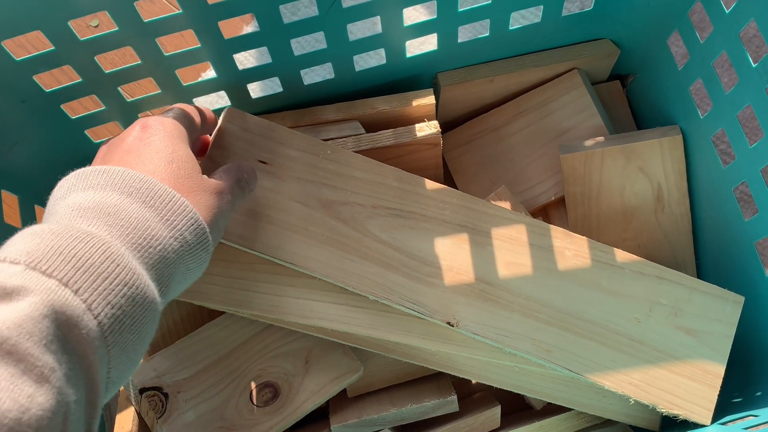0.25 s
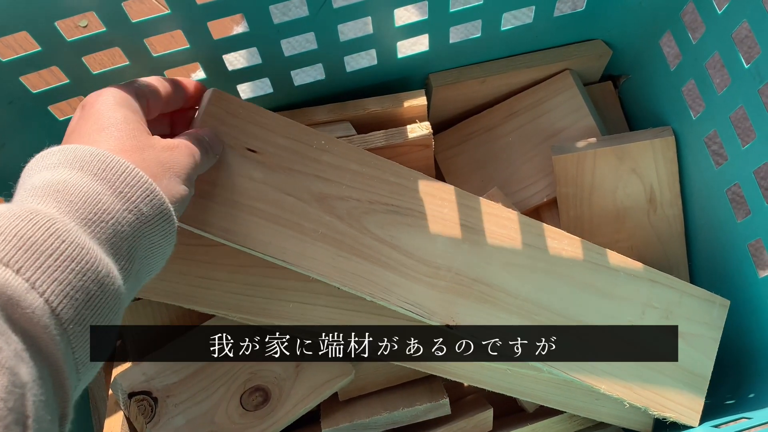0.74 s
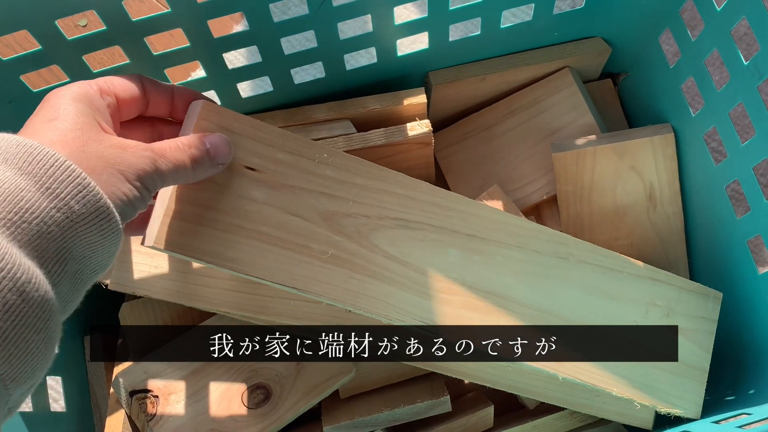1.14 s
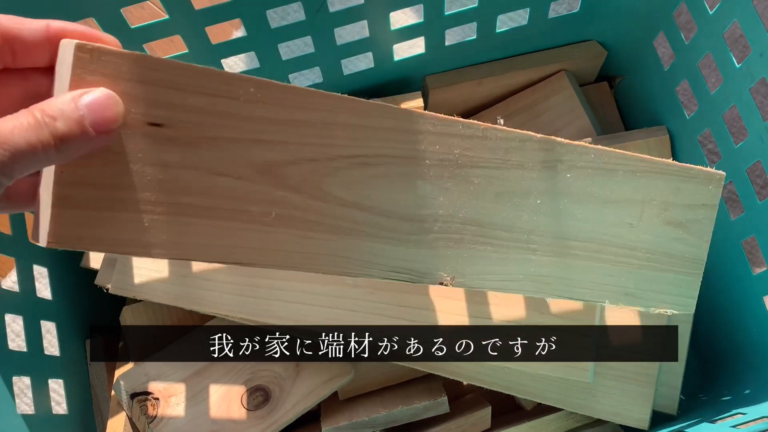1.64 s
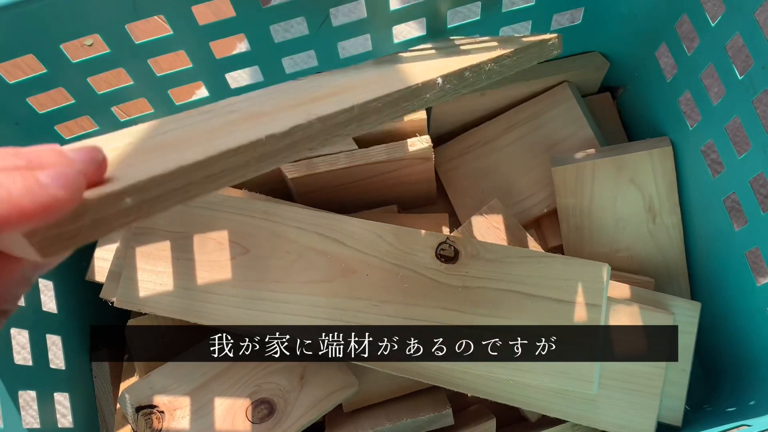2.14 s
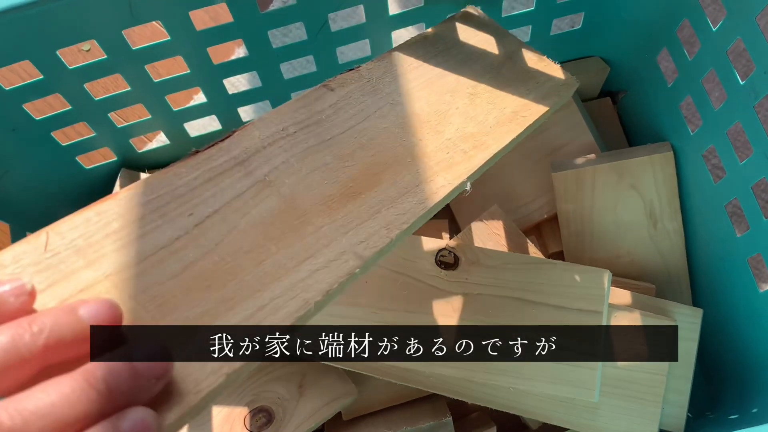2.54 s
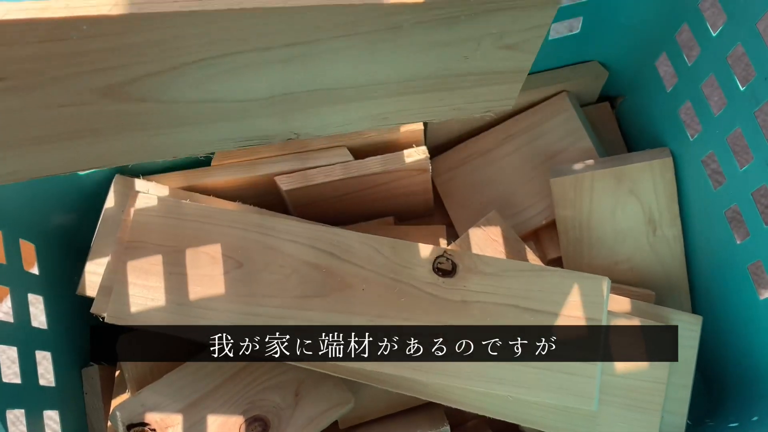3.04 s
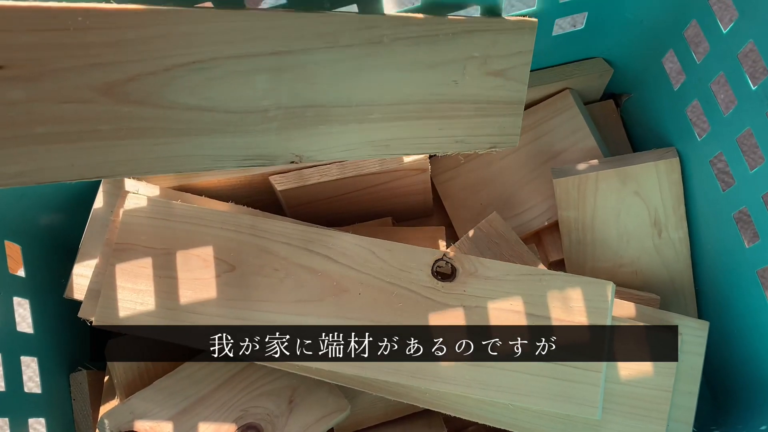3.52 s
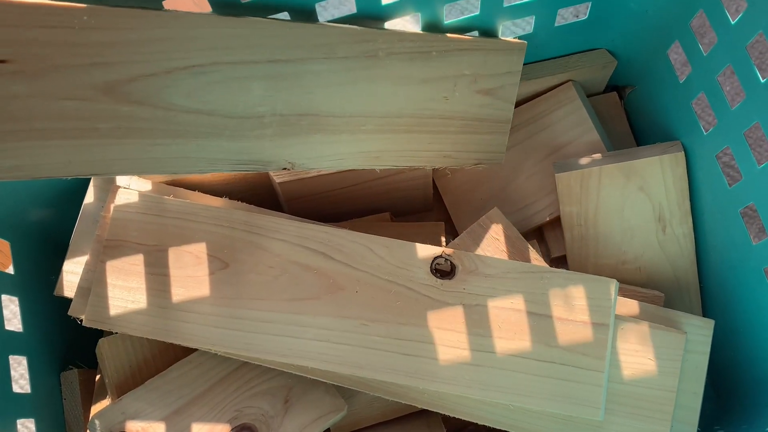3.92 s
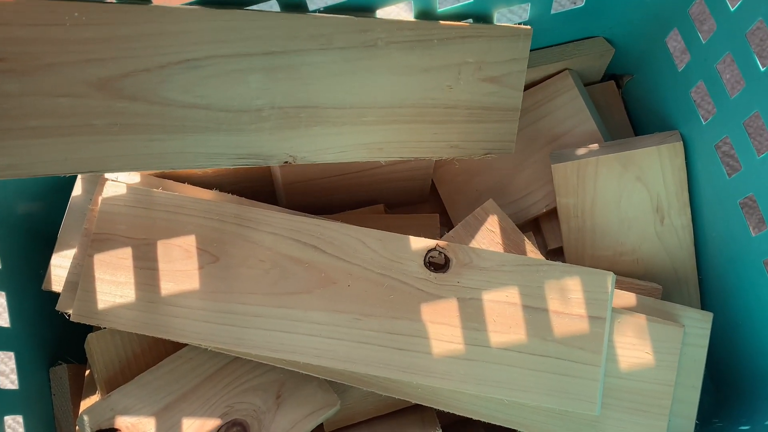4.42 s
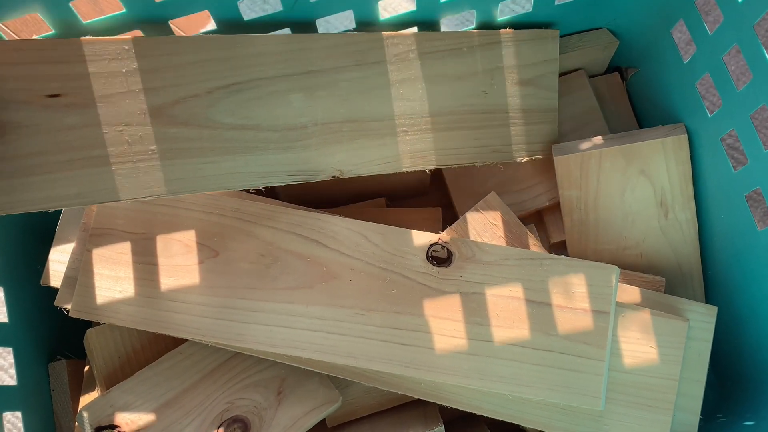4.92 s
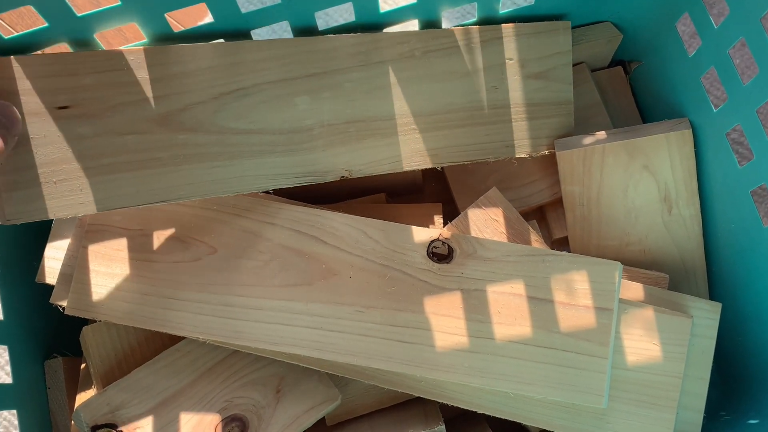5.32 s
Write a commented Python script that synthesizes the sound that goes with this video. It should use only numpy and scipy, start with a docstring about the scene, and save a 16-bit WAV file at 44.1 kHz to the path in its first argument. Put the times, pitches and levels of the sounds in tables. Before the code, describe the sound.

Close stereo phone pickup outdoors. A hand rubs and slides over dry wooden boards in a plastic basket with faint ticks, then a board knocks lightly at about two seconds. After a quieter gap with gusty wind, several dull knocks and scrapes rattle the pile, building to one much louder clack near five seconds, then a soft slide.

```python
"""Wooden boards are slid, lifted and dropped in a plastic basket outdoors, close to a phone.
Wind, hiss, a murmur and a hum, all shaped noise, run throughout. First come light touches and sliding:
uneven bursts of noise through the boards' resonances. Faint whistles, narrow noise bands, sound between
1.7 and 2.9 s. Blows at 2.2 s and from 3.3 s ring fading tones, crack and rattle the pile, amid more
sliding. The loudest falls at 4.94 s; a light blow and a last slide follow."""
import sys
import numpy as np
from scipy import signal
from scipy.fft import rfft, irfft, next_fast_len
from scipy.io import wavfile
from scipy.ndimage import uniform_filter1d, map_coordinates

SR = 44100
rng = np.random.default_rng(int(sys.argv[2]) if len(sys.argv) > 2 else 0)


def inscribe(sig):
    """Save sig as 16-bit PCM at rate SR to the path in sys.argv[1].

    A 1-D sig is mono; a 2-D sig holds one channel per row.
    Samples are clipped to [-1, 1] before scaling.
    """
    pcm = np.round(np.clip(np.atleast_2d(sig).T, -1, 1) * 32767)
    wavfile.write(sys.argv[1], SR, pcm.astype(np.int16))


N = 245195  # length in samples

# Steady background hiss, its colour: (f/Hz, relative level/dB)
HISS_COLOUR = [(150, 7), (400, 1), (1000, -2), (2500, -6.5), (4600, -6.5), (7000, -8.5), (11000, -5),
               (13000, 2.5), (15800, -4.5)]
# Distant outdoor murmur, its colour: (f/Hz, relative level/dB)
MURMUR_COLOUR = [(300, -10), (600, -3.5), (1000, -9.5), (1400, -6.5), (2200, -14), (3000, -16)]
# Wind on the microphone over time: (t/s, strength/dB)
WIND_STRENGTH = [(0.0, -68.5), (0.2, -64.5), (0.4, -70.5), (1.25, -66), (1.43, -57), (1.56, -66),
                 (2.11, -64), (2.26, -62.5), (2.68, -59), (2.91, -50.5), (3.27, -53), (3.64, -54),
                 (4.27, -58), (4.73, -58), (4.79, -50.5), (4.9, -46), (5.0, -51), (5.13, -56.5),
                 (5.56, -68.5)]
# Slow, deep wind buffets, their colour: (f/Hz, relative level/dB)
BUFFET_COLOUR = [(20, -36.5), (40, 9.5), (70, 9.5), (110, 7.5), (200, -3), (300, -65)]
# Faster wind flutter, its colour: (f/Hz, relative level/dB)
FLUTTER_COLOUR = [(120, -19), (220, 7.5), (350, -5), (500, -11), (800, -46), (1200, -61.5)]
# Faint wavering tones while the board swings through the air: (t/s, hold/s, pitch f/Hz, level/dB)
WHISTLES = [(1.768, 0.054, 990, -82.5), (2.574, 0.029, 1170, -84), (2.61, 0.054, 905, -76.5),
            (2.627, 0.073, 1310, -81.5), (2.69, 0.12, 1110, -79.5)]
# Short rings at one pitch, from faint taps to strong blows, each with a crack: (t/s, ring level/dB,
# pitch f/Hz, time to fade by 60 dB/s, crack level against the ring/dB)
SHORT_RINGS = [(0.079, -57, 454, 0.11, -30), (0.7, -53, 500, 0.037, -34), (1.2284, -48, 13900, .015, -7),
               (1.3295, -51, 3570, 0.013, -3), (1.3594, -62, 2840, 0.022, -6),
               (1.3856, -51, 3390, 0.017, -9), (1.411, -43.5, 2220, 0.017, -7),
               (1.646, -68, 3500, .012, -12), (1.698, -57, 1880, 0.0089, -15),
               (2.199, -61, 1940, 0.03, -19), (3.405, -59.5, 3200, .04, -20),
               (3.408, -56.5, 1207, .06, -18), (3.506, -35.5, 1183, 0.063, -30),
               (3.673, -45.5, 890, 0.098, -25), (3.8353, -52.5, 6450, 0.018, -6),
               (4.842, -33, 7150, 0.022, -20), (4.8455, -13, 823, 0.027, -34.5),
               (4.8758, -26.5, 7230, 0.021, -17.5), (4.886, -38, 7170, 0.023, -21),
               (4.984, -38, 10950, 0.013, -11.5)]
# Sliding strokes: (full contact t/s, rise/s, hold/s, hiss level/dB, change during the hold/dB,
# hum level of the boards/dB, treble change/dB, share of board on board against hand on board/0-1,
# singing resonance f/Hz, its level against the hiss/dB)
STROKES = [(0.074, 0.13, 0.048, -54, -9, -80, -11.5, 0.04, 2300, -21),
           (0.159, 0.04, 0.031, -52.5, -13, -62, -14, 0.26, 1790, -19),
           (0.332, 0.099, 0.19, -63, -22, -83, -9, 0.2, 1740, -18),
           (0.615, 0.15, 0.13, -48, -5, -69.5, -11.5, 0.23, 1785, -21),
           (0.814, 0.13, 0.15, -63, -13, -101, -1.5, 0.22, 2880, -11.5),
           (0.994, 0.13, 0.25, -58, -9, -81, -10.5, 0.2, 1785, -24),
           (1.326, 0.027, 0.059, -54, -1.5, -76, -16, 0.3, 2220, -15.5),
           (1.407, 0.0088, 0.0096, -51.5, -5, -61.5, -15, 0.35, 2200, -18),
           (2.225, 0.016, 0.085, -45.5, -16, -76, -15.5, 0.9, 3380, -19.5),
           (2.912, 0.1, 0.045, -66.5, -4.5, -73.5, -9.5, 0.64, 3230, -13),
           (3.495, 0.011, 0.1, -48.5, -12, -50.5, -9, 0.85, 3370, -14),
           (3.623, 0.077, 0.12, -57, 6.5, -58, -8.5, 0.9, 3320, -16),
           (3.998, 0.03, 0.12, -69.5, -8.5, -73, -3.5, 0.3, 1820, -17),
           (4.084, 0.039, 0.15, -54, -4, -73.5, -6.5, 0.08, 1766, -16),
           (4.318, 0.084, 0.37, -52, -22.5, -78, -7.5, 0.05, 2157, -11),
           (4.604, 0.17, 0.2, -56.5, 3.5, -77, -11, 0.09, 1790, -26),
           (4.805, 0.15, 0.15, -46, -10, -42.5, -2.5, 0.83, 3680, -14),
           (4.985, 0.045, 0.24, -63, -27.5, -44, -23, 0.94, 3716, -9),
           (5.073, 0.18, 0.18, -60, -9.5, -64.5, -7.5, 0.52, 3660, -9.5),
           (5.312, 0.091, 0.045, -47, -1.5, -59.5, -4.5, 0.1, 3756, -12.5)]
# Resonances heard while faces rub:
# (f/Hz, half width/Hz, hand on board level/dB, board on board level/dB)
RUBBING_MODES = [(1310, 50, -8, -5.5), (1794, 53, -2.5, 5.5), (2253, 91, 1, -2.5), (2892, 80, -0.5, 0),
                 (3356, 130, -5, 3), (3910, 270, -4, 7), (4840, 100, -12, -27.5), (5183, 120, 8, 2),
                 (5830, 270, -6, 1), (6535, 400, -4, 1.5), (7230, 220, -4, -2), (8000, 592, -16.5, -20.5),
                 (9960, 350, 0, -2), (13000, 2100, -8, -8), (13540, 1900, -1, -5)]
# Hum of the boards while they slide, its colour: (f/Hz, relative level/dB)
SLIDE_HUM_COLOUR = [(300, 2.5), (600, -1), (1000, -8.5), (1400, -8), (2200, -13.5), (3000, -34)]
# Blows: (t/s, ring peak level/dB, hardness/dB per octave, crack level against the ring peak/dB,
# rattle level against the ring peak/dB)
KNOCKS = [(0.076, -58, -12, -43, -7), (0.153, -60, -4, -29, 2), (1.884, -56.5, -6.5, -30, 1),
          (2.225, -38.5, -0.5, -20, 7.5), (2.232, -38, -6, -43, 6), (2.239, -28.5, -2.5, -33, -22),
          (2.258, -34, -3, -38, 1), (2.272, -39.5, -6, -20, 1.5), (3.2994, -52, 6, -3, 14.5),
          (3.311, -38.5, -4, -51, -31), (3.405, -49.5, -5.5, -4.5, 1), (3.493, -49, -13.5, -3, 23.5),
          (3.505, -32, 0.5, -21, 2), (3.519, -43, 1, -49, -26), (3.538, -50, 5, -25, -13),
          (3.750, -39.5, 3, -5, 2), (3.757, -35.5, -4.5, -13.5, -3), (3.786, -39, -4.5, -30.5, -2.5),
          (4.08, -46, -2, -37, -4.5), (4.207, -45, -37, -11, -54), (4.3175, -37, -0.5, -27, 6),
          (4.331, -36.5, -29, -18, -22.5), (4.39, -43, -2, -33, -2), (4.4, -40.5, -39.5, -23, -1.5),
          (4.466, -44, -7, -44, -0.5), (4.477, -48.5, -20, -26.5, -4), (4.668, -46, -8, -39, 11.5),
          (4.683, -44.5, -3, -35, 0), (4.699, -37.5, -5, -30.5, -0.5), (4.713, -43, -1.5, -27, 8.5),
          (4.824, -34.5, -2, -17, 15), (4.846, -16.5, 2, -20, -2), (4.863, -24.5, -3, -20, -25.5),
          (4.884, -51, -2.5, -33, -17.5), (4.937, -28, 12, -21, -36), (4.9426, -4, 14, -33, -13),
          (4.9463, -19.5, 12, -35, -9), (4.959, -24, 0, -37.5, -10.5), (4.972, -26, 10.5, -31.5, -8),
          (4.992, -35, 1.5, -33.5, -5.5), (5.304, -49, -18.5, -15.5, -1)]
# Ringing tones of the basket (lowest) and boards: (f/Hz, relative level/dB, time to fade by 60 dB/s)
BOARD_MODES = [(89.2, -14, 0.37), (203.8, 2, 0.03), (249, -0.5, 0.068), (380.7, 4, 0.052), (496, -6, 0.089),
               (623, 0, 0.011), (777, 9, 0.014), (937, 5.5, 0.014), (1056, 10, 0.015), (1176, -7.5, 0.03),
               (1245, 4, 0.015), (1442, -0.5, 0.017), (1626, -15.5, 0.021), (2060, -36, 0.02),]
# Rattle of the loose pile, its colour: (f/Hz, relative level/dB)
PILE_COLOUR = [(100, -4.5), (300, 8.5), (1000, -11.5), (1700, -9.5), (2500, 1), (5000, -23.5),
               (16000, -36.5)]
# How fast the rattle dies: (f/Hz, time to fade by 60 dB/s)
PILE_FADE = [(200, 0.18), (1000, 0.21), (2000, 0.046), (8000, 0.0082)]
# Likeness of the two channels in the noises: (f/Hz, likeness/0-1)
LIKENESS = [(60, .99), (170, .97), (350, .93), (520, .85), (700, .6), (1000, .87), (1400, .93), (2200, .72),
            (2800, .7), (3500, .9), (4300, .99)]
# The phone's stereo balance: (f/Hz, left minus right level/dB)
LEAN = [(100, 1), (330, 4), (700, -1), (1300, 0), (2400, -1.5), (4000, 0)]
# The phone's phase between the channels: (f/Hz, phase/radians)
PHASE_TURN = [(60, 0), (170, .2), (350, .5), (690, 1.1), (1000, -.2), (1400, -.2), (1750, -.65),
              (2240, -1.4), (2750, -.4), (3400, 0)]

HISS_DB, MURMUR_DB = -77, -84
DRONE_HZ, DRONE_WIDTH_HZ, DRONE_DB = 187.3, 4.3, -76.5  # half width
FLUTTER_DB, FLUTTER_GROWS = -7.5, 1.2  # against the mean strength; swings wider than the gusts
WHISTLE_RISE_S, WHISTLE_WIDTH_HZ = 0.04, 70  # half width
RISE_DB, RELEASE_S = 37, 0.053  # a sound swells by this much, and drops by it again on release
SING_WIDTH_HZ = 172  # of each of two filters in a row
RATTLE_HARD = 0.35  # share of a blow's hardness that passes on to the rattle
TOP_HZ, WIDEN_HZ, LAG_S = 15830, 2525, 1 / 4250  # the phone's upper limit; its treble lag


def amp(db):
    """Turn decibels into a plain factor."""
    return 10 ** (np.asarray(db) / 20)


def unit(x):
    """Scale a sound to an average (rms) strength of 1."""
    return x / np.sqrt(np.mean(x ** 2) + 1e-20)


def along(points, hz):
    """Read a (Hz, value) curve, with frequency on a log scale."""
    f, value = np.transpose(points)
    return np.interp(np.log(hz + 1), np.log(f + 1), value)


def shape(points):
    """Make a gain over frequency from (Hz, dB) points."""
    return lambda hz: amp(along(points, hz))


def wobble(rate):
    """A smooth random curve with this many random points a second."""
    points = rng.standard_normal(int(N * rate / SR) + 4)
    return map_coordinates(points, [np.arange(N) * rate / SR])


def filtered(x, response):
    """Change each frequency of a sound by a gain, which may also turn its phase."""
    size = next_fast_len(N + SR // 2)
    spectrum = rfft(x, size) * response(np.fft.rfftfreq(size, 1 / SR))
    return irfft(spectrum, size)[..., :N]


def band(centre, width):
    """Gain that lets one narrow band through and is halved one width from its centre."""
    return lambda hz: 1 / (1 + ((hz - centre) / width) ** 2)


def stereo_angle(hz):
    """Angle that splits noise into middle and side parts to give the channels their likeness."""
    return np.arccos(along(LIKENESS, hz)) / 2


def rush(gain, patchy_db, lumps=1):
    """Stereo noise of rms 1, with patches of random gain over time and frequency."""
    grid = signal.stft(lumps * rng.standard_normal((2, N)), nperseg=512)[2]
    patches = uniform_filter1d(rng.standard_normal(grid.shape[1:]), size=3, axis=0)
    patches = uniform_filter1d(patches, size=16, axis=1)
    pair = signal.istft(grid * amp(patchy_db * unit(patches)), nperseg=512)[1][:, :N]

    def split(hz):
        return gain(hz) * [np.cos(stereo_angle(hz)), np.sin(stereo_angle(hz))]

    mid, side = filtered(pair, split)
    return unit(np.array([mid + side, mid - side]))


def add(out, s, db, sound):
    """Mix a sound in at time s."""
    out[:, round(s * SR):][:, :sound.shape[-1]] += amp(db) * sound


def swell_and_fade(s, rise, hold, change_db):
    """Gain over time: swell up to time s, drift while held, let go."""
    times = s + np.cumsum([-rise, rise, hold, RELEASE_S])
    levels = [-RISE_DB, 0, change_db, change_db - RISE_DB]
    return amp(np.interp(np.arange(N) / SR, times, levels, left=-200, right=-200))


def rubbing(column):
    """Gain over frequency of the rubbing resonances, for one level column, with the bass cut."""
    hz, width, db = np.transpose(RUBBING_MODES)[[0, 1, column], :, None]

    def gain(f):
        peaks = np.sum(amp(2 * db) * band(hz, width)(f) ** 2, 0)
        return np.sqrt(amp(-26.5) + peaks) * f ** 2 / (f ** 2 + 1300.0 ** 2)

    return gain


def woody(f):
    """Gain over frequency of noise that passes through the ringing tones of basket and boards."""
    hz, level = np.transpose(BOARD_MODES)[:2, :, None]
    peaks = np.sum(amp(0.15 * level) * band(hz, 0.029 * hz)(f) ** 2, 0)
    return np.sqrt(amp(-11.5) + peaks)


def hiss_and_murmur():
    """Steady noise: a faint hiss over a distant outdoor murmur."""
    hiss = rush(shape(HISS_COLOUR), patchy_db=2)
    murmur = rush(shape(MURMUR_COLOUR), patchy_db=2.5)
    return amp(HISS_DB) * hiss + amp(MURMUR_DB) * murmur


def drone():
    """A faint hum from afar: noise so narrow that it sounds like one pitch."""
    noise = rng.standard_normal(N)
    return amp(DRONE_DB) * unit(filtered(noise, band(DRONE_HZ, DRONE_WIDTH_HZ)))


def wind():
    """Eddies buffet the microphone in slow lumps, with a faster flutter above."""
    strength_db = np.interp(np.arange(N) / SR, *np.transpose(WIND_STRENGTH))
    mean_db = strength_db.mean()
    flutter_db = mean_db + FLUTTER_DB + FLUTTER_GROWS * (strength_db - mean_db)
    buffet = rush(shape(BUFFET_COLOUR), patchy_db=3, lumps=amp(2.5 * wobble(7)))
    flutter = rush(shape(FLUTTER_COLOUR), patchy_db=3, lumps=amp(1.5 * wobble(25)))
    return amp(strength_db) * buffet + amp(flutter_db) * flutter


def whistles():
    """A board swinging through the air: narrow bands of noise that swell and fade."""
    out = np.zeros(N)
    for s, hold, hz, db in WHISTLES:
        tone = unit(filtered(rng.standard_normal(N), band(hz, WHISTLE_WIDTH_HZ)))
        out += amp(db) * swell_and_fade(s, WHISTLE_RISE_S, hold, 0) * tone
    return out


def short_rings():
    """Short rings at one pitch, from faint taps to strong blows, each with a wide crack of noise."""
    out, t = np.zeros((2, N + SR)), np.arange(SR // 5) / SR
    for s, db, hz, t60, crack_db in SHORT_RINGS:
        ring = amp(-60 * t / t60) * np.sin(2 * np.pi * hz * t) * (1 - np.exp(-t / 0.0018))
        noise = signal.lfilter(*signal.iirpeak(hz, 1, SR), rng.standard_normal(len(t)))
        crack = amp(crack_db - 60 * t / 0.0087) * unit(noise)
        add(out, s, db, ring + crack)
    return out[:, :N]


def sliding():
    """Rough faces catch in uneven grains that excite resonances; the grip lets one of them sing."""
    catch = amp(3 * wobble(400) + 0.8 * wobble(60) + 0.5 * wobble(18))
    hand = rush(rubbing(column=2), patchy_db=3.5, lumps=catch)
    board = rush(rubbing(column=3), patchy_db=3.5, lumps=catch)
    hum_lumps = amp(2 * wobble(200) + 1.2 * wobble(70) + 0.6 * wobble(20))
    hum = rush(lambda f: shape(SLIDE_HUM_COLOUR)(f) * woody(f), patchy_db=2.5, lumps=hum_lumps)
    grit = rush(np.ones_like, patchy_db=3, lumps=catch)
    faces = np.array([hand, board])
    # fine dust and light touch sound brighter
    treble = filtered(faces, lambda f: f ** 8 / (f ** 8 + 3130.0 ** 8))
    out = np.zeros((2, N))
    for s, rise, hold, hiss_db, change_db, hum_db, treble_db, share, sing_hz, sing_db in STROKES:
        now = slice(max(round((s - rise) * SR), 0), round((s + hold + RELEASE_S) * SR))
        mix = np.sqrt([1 - share, share])[:, None, None]
        coloured = faces[..., now] + (amp(treble_db) - 1) * treble[..., now]
        hiss = np.sum(mix * coloured, 0)
        mode = signal.iirpeak(sing_hz, sing_hz / SING_WIDTH_HZ, SR)
        singing = signal.lfilter(*mode, signal.lfilter(*mode, grit[:, now]))
        hiss = hiss + amp(sing_db) * unit(singing)
        envelope = swell_and_fade(s, rise, hold, change_db)[now]
        out[:, now] += envelope * (amp(hiss_db) * hiss + amp(hum_db) * hum[:, now])
    return out


def rattle(length, hard_db):
    """Loose boards shake on, brighter after a hard blow; each frequency dies at its own speed."""
    hz, t, grid = signal.stft(rng.standard_normal((2, length)), SR, nperseg=512)
    angle = stereo_angle(hz)[:, None]
    mid, side = grid[0] * np.cos(angle), grid[1] * np.sin(angle)
    octaves = np.log2(np.clip(hz, 200, 1500) / 600)
    colour_db = along(PILE_COLOUR, hz) + RATTLE_HARD * hard_db * octaves
    fade = amp(colour_db[:, None] - 60 * t / along(PILE_FADE, hz)[:, None])
    pair = np.array([mid + side, mid - side]) * fade * woody(hz)[:, None]
    tail = signal.istft(pair, SR, nperseg=512)[1][:, :length]
    swell = 1 - np.exp(-np.arange(length) / (0.018 * SR))
    return tail / np.abs(tail).max() * swell


def knocks():
    """Each blow rings the tones, high ones more when hard, cracks, and sets the pile rattling."""
    out, cracks, t = np.zeros((2, N + SR)), np.zeros((1, N + SR)), np.arange(SR // 3) / SR
    hz, level, t60 = np.transpose(BOARD_MODES)[:, :, None]
    octaves = np.log2(np.maximum(hz, 250) / 600)
    # about a cycle: low bending waves arrive later
    rise = 1 - np.exp(-(t * np.maximum(hz, 250) / 1.23) ** 2)
    for s, db, hard_db, crack_db, rattle_db in KNOCKS:
        strength = level + hard_db * octaves + rng.normal(0, 1.6, hz.shape)
        # boards differ a little and rest differently
        tune = hz * (1 + rng.normal(0, 0.007, hz.shape))
        tones = rise * amp(strength - 60 * t / t60) * np.sin(2 * np.pi * tune * t)
        ring = np.sum(tones, 0)
        ring = ring / np.abs(ring).max()
        add(out, s, db, ring + amp(rattle_db) * rattle(len(t), hard_db))
        add(cracks, s, db + crack_db, amp(-60 * t / 0.032) * (1 - np.exp(-t / 0.0017)))
    crack_noise = rush(rubbing(column=3), patchy_db=4.0)
    return out[:, :N] + cracks[:, :N] * crack_noise


def scene():
    """Add all layers, from the background to the blows."""
    background = hiss_and_murmur() + drone() + wind()
    return background + whistles() + short_rings() + sliding() + knocks()


def record(dry):
    """The phone cuts deep bass and the top, and widens the stereo by level, phase and treble lag."""
    sides = np.array([[1], [-1]])  # left, right

    def response(hz):
        treble_part = hz ** 4 / (hz ** 4 + 1300 ** 4)
        phase = np.pi * LAG_S * (hz - WIDEN_HZ) * treble_part - along(PHASE_TURN, hz) / 2
        wide = amp(along(LEAN, hz) * sides / 2) * np.exp(1j * phase * sides)
        bass_cut = hz ** 2 / (hz ** 2 + 32 ** 2)
        return wide * bass_cut * (hz < TOP_HZ)

    return filtered(dry, response)


dry = scene()
out = record(dry)
inscribe(out)
```